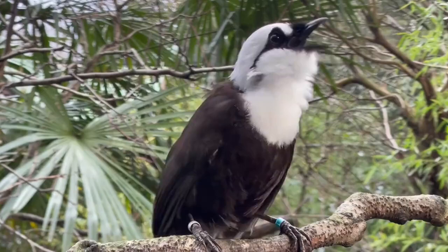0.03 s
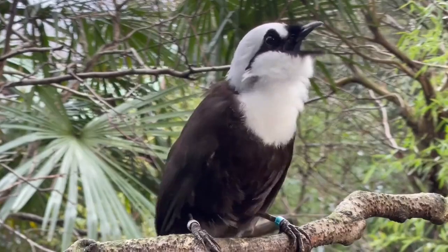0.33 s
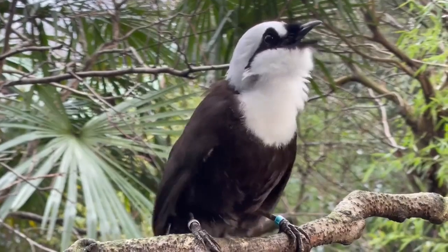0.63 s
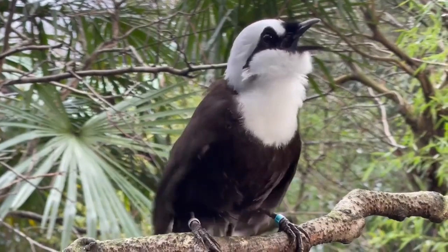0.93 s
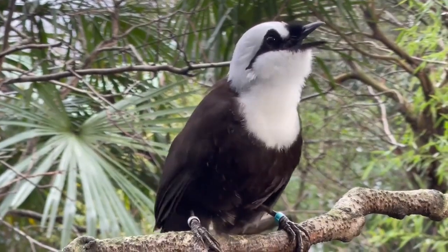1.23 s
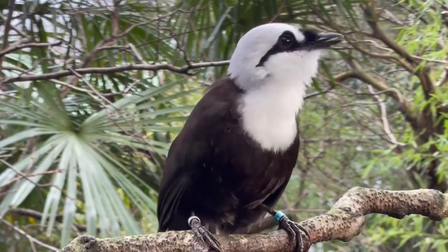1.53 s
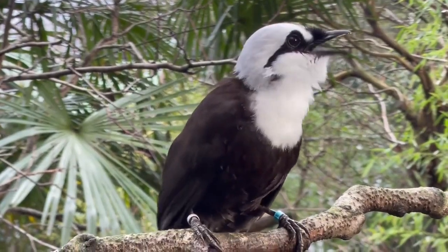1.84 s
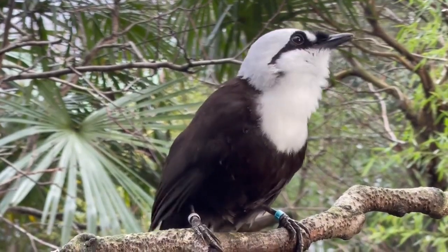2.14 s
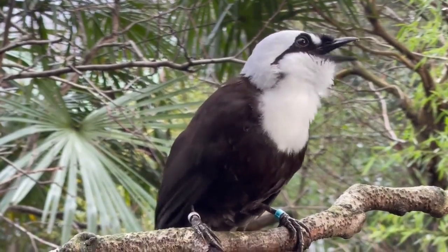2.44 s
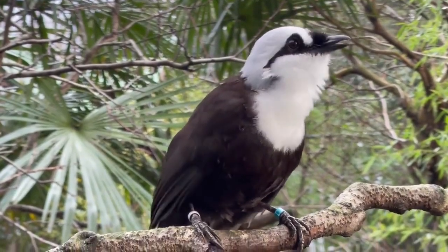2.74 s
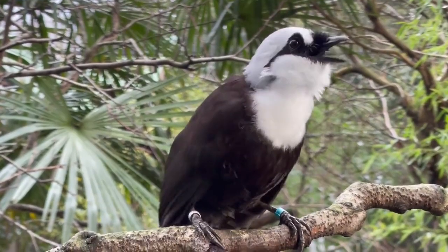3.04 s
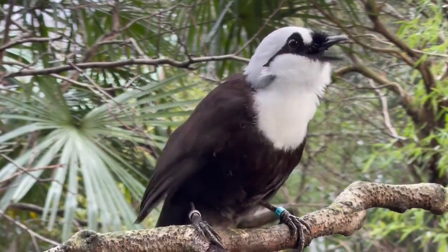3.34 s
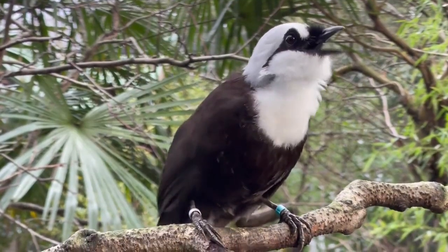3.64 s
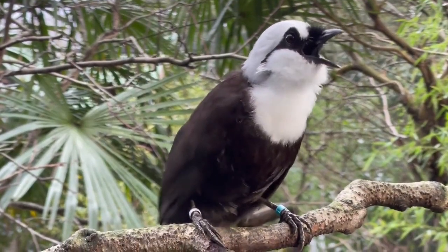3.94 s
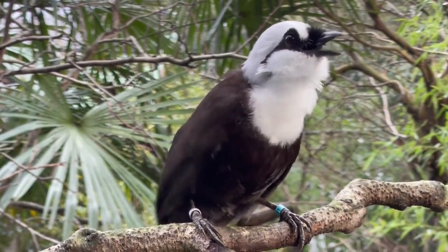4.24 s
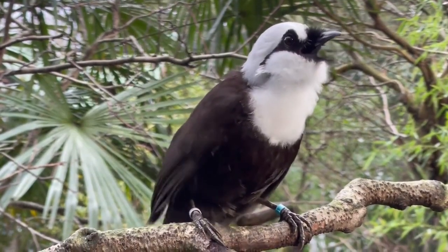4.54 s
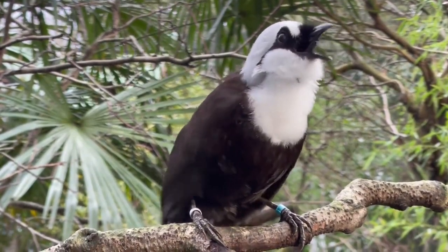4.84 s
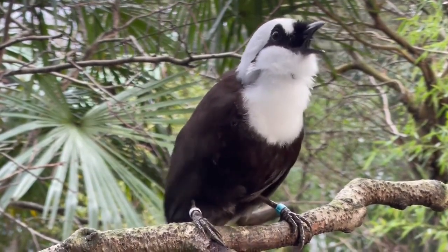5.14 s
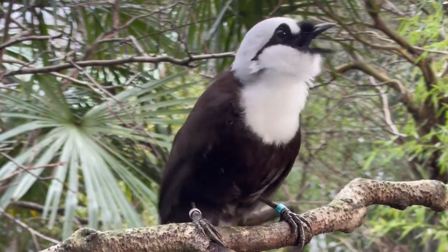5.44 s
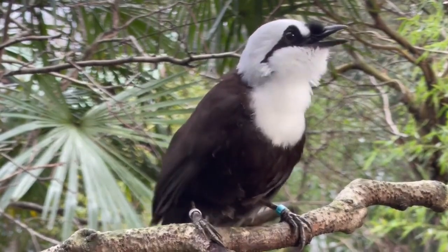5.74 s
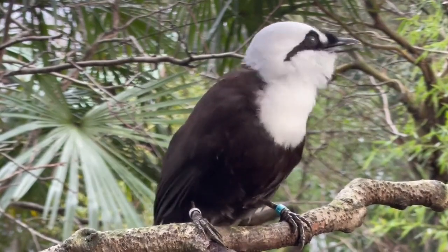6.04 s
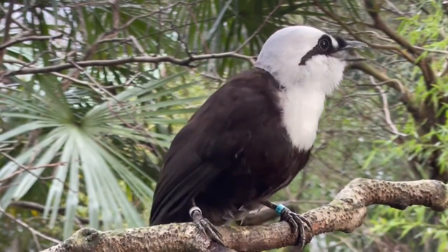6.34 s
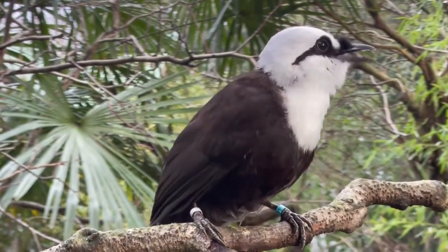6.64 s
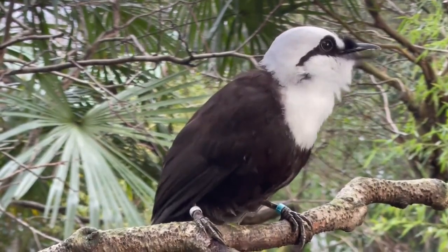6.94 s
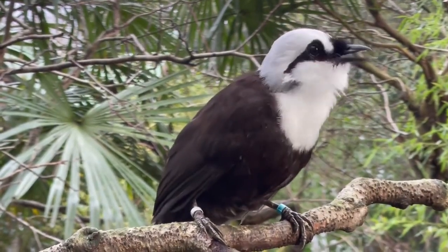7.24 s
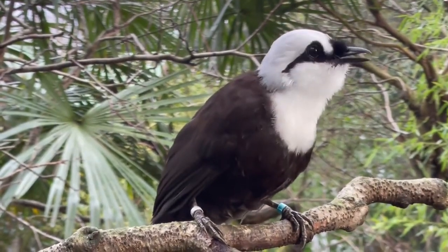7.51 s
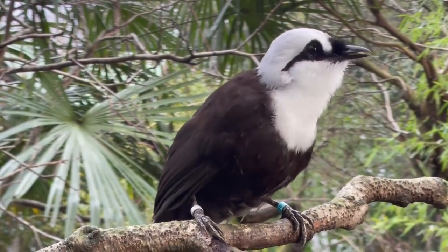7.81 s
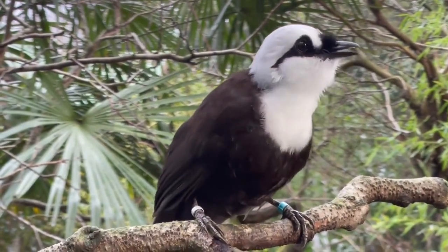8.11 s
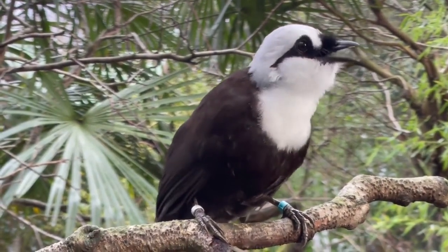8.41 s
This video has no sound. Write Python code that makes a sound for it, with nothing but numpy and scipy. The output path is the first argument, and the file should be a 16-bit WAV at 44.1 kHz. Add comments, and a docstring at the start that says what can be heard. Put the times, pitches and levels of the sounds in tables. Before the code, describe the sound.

Close, loud laughingthrush chatter alternates with quick upward whistles among foliage, with faint low traffic noise far away.

```python
"""Among foliage, a laughingthrush on a branch close by calls in rapid runs: sharp arched chips and
mellow rising whistles, many led in by a hoarse slur. Its throat cavity boosts one harmonic of the
syrinx, the second in chips and the first in whistles; the rest leave through windpipe and beak.
Leaves scatter the calls back, another bird whistles thinly far off, and distant traffic rumbles."""
import sys
import numpy as np
from scipy import signal
from scipy.fft import rfft, irfft, next_fast_len
from scipy.io import wavfile
from scipy.ndimage import uniform_filter1d, minimum_filter1d, map_coordinates

SR = 44100
rng = np.random.default_rng(int(sys.argv[2]) if len(sys.argv) > 2 else 0)


def generate_wav(signal):
    """Clip the signal to [-1, 1] and save it as 16-bit WAV at the path in sys.argv[1]."""
    frames = np.transpose(np.atleast_2d(signal))
    scaled = np.clip(frames, -1, 1) * 32767
    pcm = np.round(scaled).astype(np.int16)
    wavfile.write(sys.argv[1], SR, pcm)


N = 373527
BAND_LIMIT_HZ = 15700
# windpipe and beak, narrowed for slurs and whistles: f/Hz, gain/dB
NARROW_BEAK = [(2000, 16.5), (2700, 10.5), (3400, 6.5), (4300, -2.5), (5600, -1.5), (6800, 4), (8500, 2.5),
               (9800, 8.5), (11500, -0.5), (13000, -9.5), (15000, -22)]


def amp(db):
    """Decibels to amplitude."""
    return 10 ** (np.asarray(db) / 20)


def unit_rms(x):
    """Scales x to an rms of 1."""
    return x / np.sqrt(np.mean(x ** 2) + 1e-20)


def curve(points, hz, column=1):
    """One column of a spectrum table, joined on a log-frequency scale."""
    table = np.array(points, float)
    return np.interp(np.log(hz + 1), np.log(table[:, 0] + 1), table[:, column])


def bump(f, hz, half_width):
    """A resonance curve of height 1."""
    return 1 / (1 + ((f - hz) / half_width) ** 2)


def add(mix, start, sound):
    """Mixes a sound in at start seconds."""
    part = mix[round(start * SR):][:len(sound)]
    part += sound[:len(part)]


def colour(x, gain):
    """Filters x by gain(hz)."""
    size = next_fast_len(x.shape[-1] + 512)
    return irfft(rfft(x, size) * gain(np.fft.rfftfreq(size, 1 / SR)), size)[..., :x.shape[-1]]


def wander(size, hz):
    """Random drift of rms 1, rolling off above hz."""
    return unit_rms(colour(rng.standard_normal(size), lambda f: np.exp(-(f / hz) ** 2)))


def note_clock(start, end, fade_s=0.001955):
    """Onset time, progress u (0-1) through a note, and a gate that fades just outside its ends."""
    t = np.arange(start - fade_s, end + fade_s, 1 / SR)
    gate = np.sin(np.pi / 2 * np.clip(np.minimum(t - t[0], t[-1] - t) / fade_s, 0, 1)) ** 2
    return t[0], np.clip((t - start) / (end - start), 0, 1), gate


def glide(steps, u):
    """Smooth pitch line through evenly spaced steps."""
    return map_coordinates(np.array(steps, float), [u * (len(steps) - 1)], order=3, mode="nearest")


def traffic():
    """A stereo bed of outdoor air and far traffic rumble, with two drones that come and go."""
    # colour of the bed: f/Hz, relative level/dB
    spectrum = [(20, -6.5), (35, -21), (52, 5), (78, -8), (100, -7.5), (150, -9.5), (250, -14.5),
                (420, -22.5), (800, -20), (1500, -20.5), (2600, -30), (5000, -43.5), (10000, -49),
                (14000, -60.5)]
    # likeness of left and right: f/Hz, correlation
    likeness = [(60, 1), (125, 0.95), (250, 0.86), (600, 0.3), (2000, 0.27), (8000, 0.22)]
    # noise band of each drone: f/Hz, half-width/Hz
    drone_bands = [(60, 12.5), (104, 10.7)]
    # swells of the drones: t/s, lower drone level/dB, upper drone level/dB
    drone_swells = [(.15, -48.5, -57), (1.1, -46.5, -54.5), (1.5, -54, -47.5), (2.9, -47.5, -46),
                    (3.5, -55.5, -58.5), (4.15, -47, -49.5), (4.9, -56.5, -51.5), (6.2, -45.5, -49.5),
                    (8.4, -44.5, -53.5)]
    shared, apart = rng.standard_normal((2, N))
    mid = colour(shared, lambda f: amp(curve(spectrum, f)) * np.sqrt(1 + curve(likeness, f)))
    side = colour(apart, lambda f: amp(curve(spectrum, f)) * np.sqrt(1 - curve(likeness, f)))
    bed_db = -45.5 + 1.1 * wander(N, hz=3)
    out = amp(bed_db) * unit_rms(np.array([mid + side, mid - side]))
    times, *levels = np.transpose(drone_swells)
    for (hz, half_width), db in zip(drone_bands, levels):
        drone = colour(rng.standard_normal(N), lambda f: 1 / (1 + ((f - hz) / half_width) ** 4))
        out += unit_rms(drone) * amp(np.interp(np.arange(N) / SR, times, db))
    return out * amp([[.4], [-.4]])  # leans slightly left


def motor_hum():
    """One wavering line of a distant motor that comes and goes, sinking in pitch."""
    # course of the hum: t/s, f/Hz, level/dB
    course = [(.1, 225, -74), (2.2, 235, -61), (3.9, 212, -62), (4.6, 208, -53), (5.3, 210, -62),
              (6.1, 192, -49.5), (6.8, 180, -68), (8.45, 180, -72)]
    times, *columns = np.transpose(course)
    hz, db = (np.interp(np.arange(N) / SR, times, c) for c in columns)
    phase = 2 * np.pi * np.cumsum(hz * (1 + .032 * wander(N, hz=21.4))) / SR
    return amp(db) * unit_rms((1 + .48 * wander(N, hz=26)) * np.sin(phase))


def beak_at(time, shape):
    """Gain curve of windpipe and beak: the gape moves a treble resonance and lets out more or less sheen."""
    # effect of the gape: t/s, resonance f/Hz, boost/dB, sheen/dB
    gape = [(.1, 5230, 8.5, -11), (.9, 5400, 14, 1.5), (1.5, 5720, 18.5, 8), (2.7, 6640, -17.5, -9.5),
            (2.85, 7040, 12, 0), (3.19, 8600, 10, -8), (3.6, 8670, 12, -28), (3.67, 5740, 9.5, 2),
            (5.5, 5700, 7, -8), (5.7, 5350, 20, 15), (6.5, 6730, 8.5, -4), (8.4, 6930, 15.5, 4)]
    times, *columns = np.transpose(gape)
    hz, boost_db, sheen_db = (np.interp(time, times, c) for c in columns)
    grid_hz = np.linspace(0, SR / 2, num=32)
    tint_db = 1.8 * rng.standard_normal(len(grid_hz))  # each note takes its own colour
    return lambda f: amp(curve(shape, f) + boost_db * bump(f, hz, half_width=480)
                         + sheen_db * bump(f, hz=12800, half_width=1530)
                         + np.interp(f, grid_hz, tint_db))


def syrinx(hz, beak, jitter, flutter, breathy, square_db, boosted):
    """The harmonic that the throat boosts, and the breathy overtones above it with a treble of rms 1."""
    size = len(hz)
    phase = 2 * np.pi * np.cumsum(hz * (1 + jitter * wander(size, hz=1080))) / SR
    overtones = np.zeros(size)
    for k in range(boosted + 1, 19):
        # a hard-driven tone squares off, which favours its odd multiples
        odd_multiple = k % (2 * boosted) == boosted
        gain = beak(k * hz) * amp(square_db * odd_multiple) * (k * hz < BAND_LIMIT_HZ)
        flicker = 1 + flutter * wander(size, hz=130)
        overtones += gain * flicker * np.cos(k * phase + 2 * np.pi * rng.random())
    # air escapes in a puff each cycle and takes the same way out
    puffs = colour(rng.standard_normal(size) * (1 + np.cos(phase)), lambda f: beak(f) * (f > 700))
    overtones = unit_rms(overtones) + breathy * unit_rms(puffs)
    treble = colour(overtones, lambda f: f > 5000)
    return np.sqrt(2) * np.cos(boosted * phase), overtones / treble.std()


def chip(start, length, tune, top_hz, db, treble_db):
    """Onset and voice of a hard-driven note that swells as it sweeps through a throat resonance."""
    # envelope: share of the note, tone/dB, overtones/dB
    envelope = [(0, -15.5, -17), (0.151, -2, -3), (.25, -3, -0.5), (.45, 1, 1.5), (.6, -2.5, 2.5),
                (.76, -3.5, -0.5), (.85, 0.5, -5), (0.909, -4.5, -2), (1, -16.5, -16.5)]
    # windpipe and beak, wide open: f/Hz, gain/dB
    open_beak = [(1100, -3), (2300, 5), (3200, -2.5), (4000, -5.5), (4750, -21.5), (5500, -3.5), (6700, -8),
                 (7500, -3.5), (8400, -4.5), (9700, 0), (10900, 1), (11700, -2), (12600, -43.5)]
    # throat resonance: f/Hz, half-width/Hz, boost/dB
    throat = (1666, 120, 7.56)
    shares, tone_db, edge_db = np.transpose(envelope)
    throat_hz, half_width, boost_db = throat
    onset, u, gate = note_clock(start, start + length)
    hz = top_hz * glide(tune, u)
    tone, overtones = syrinx(hz / 2, beak_at(start, open_beak),
                             jitter=.008, flutter=.65, breathy=.16, square_db=11, boosted=2)
    throat_db = boost_db * bump(hz, throat_hz, half_width)
    tone *= amp(db + np.interp(u, shares, tone_db) + throat_db + .6 * wander(len(u), hz=200))
    overtones *= amp(treble_db + np.interp(u, shares, edge_db))
    # the faint fundamental, an octave under the tone, grows with pitch
    fundamental_db = db - 23 + 16.5 * np.log2(hz / 2 / 1050)
    fundamental = np.sqrt(2) * np.cos(np.pi * np.cumsum(hz) / SR) * amp(fundamental_db)
    return onset, gate * (tone + fundamental + overtones)


def rasp(start, length, db):
    """Onset and sound of a chip's hoarse air, strongest as the pitch collapses and outlasting the tone."""
    # envelope: share of the note, level against the chip/dB
    envelope = [(0, -19), (.3, -30), (.7, -25.5), (.9, -16), (1, -15.5)]
    # colour of the air: f/Hz, gain/dB
    spectrum = [(500, -12), (900, -12.5), (1300, 7), (2200, -1), (2700, -1), (3400, -15.5), (4500, -12.5),
                (7000, -52)]
    onset, u, gate = note_clock(start, start + length + .0042, fade_s=.005)
    air = unit_rms(colour(rng.standard_normal(len(u)), lambda f: amp(curve(spectrum, f))))
    return onset, gate * air * amp(db + np.interp(u, *np.transpose(envelope)))


def chatter():
    """Bursts of chips: an arch, often repeated at once, then a closing hook."""
    # arched chips: t/s, count, top f/Hz, treble/dB
    arches = [(.123, 1, 2308, -30), (.332, 2, 2192, -29), (.597, 2, 2180, -29.5), (.843, 1, 2165, -28),
              (3.402, 2, 2111, -32.5), (3.674, 2, 2197, -28.5), (3.945, 2, 2224, -27.5),
              (4.211, 2, 2156, -28.5), (4.490, 2, 2177, -29), (4.762, 2, 2197, -28.5),
              (5.040, 2, 2208, -29), (5.328, 2, 2170, -29.5)]
    # hooked chips: t/s, top f/Hz, level/dB, treble/dB
    hooks = [(.204, 2300, -19.5, -29), (0.4721, 2300, -18.5, -28.5), (.738, 2215, -19.5, -31),
             (.927, 2137, -19, -29), (3.104, 2253, -26, -42.5), (3.1847, 2180, -19, -32.5),
             (3.269, 2110, -17.5, -33.5), (3.550, 2245, -18.5, -29.5), (3.8163, 2336, -18, -30.5),
             (4.088, 2223, -18.5, -29), (4.357, 2257, -18.5, -28.5), (4.6358, 2320, -18, -29),
             (4.911, 2324, -18.5, -29), (5.187, 2314, -19, -30), (5.4707, 2291, -19.5, -30.5)]
    # pitch contours at even steps through the note: share of the top pitch
    arch_tune = [.62, .69, .77, .84, .87, .93, 0.98, 0.98, .86, .68, 0.575]
    repeat_tune = [.63, .67, .735, .805, .84, .89, .98, 1.025, .95, .73, 0.585]
    hook_tune = [.93, .91, .89, .88, .89, .94, 1, 1, .94, .73, .58]
    arch_s, repeat_s, hook_s = .057, .049, .044
    arch_db, repeat_after_s = -19, .063
    notes = [(start, hook_s, hook_tune, *rest) for start, *rest in hooks]
    for start, count, top_hz, treble_db in arches:
        notes.append((start, arch_s, arch_tune, top_hz, arch_db, treble_db))
        if count > 1:  # the repeat is shorter and duller
            notes.append((start + repeat_after_s, repeat_s, repeat_tune, top_hz, arch_db, treble_db - 2))
    out = np.zeros(N)
    for start, length, tune, top_hz, db, treble_db in notes:
        add(out, *chip(start, length, tune, top_hz, db, treble_db))
        add(out, *rasp(start, length, db))
    return out


def foliage(calls, predelay_s=.003, early_t60=.06, build_s=.015):
    """Quick scatter from near leaves and branches, then a faint tail, different on each side."""
    # scatter of the leaves: f/Hz, early gain/dB, tail gain/dB, tail t60/s
    scatter = [(500, -23, -27, .4), (1200, -24, -28, .42), (1700, -24, -27.5, .4), (2300, -20, -21.5, .42),
               (4400, -14, -20, .33), (6000, -8, -16, .35), (12000, -8, -19, .28)]
    hz, t, noise = signal.stft(rng.standard_normal((2, 2, SR // 2)), SR, nperseg=256)
    tail_t60 = curve(scatter, hz, column=3)[:, None]
    tail = signal.istft(noise[0] * amp(-60 * t / tail_t60), SR, nperseg=256)[1]
    early = signal.istft(noise[1] * amp(-60 * t / early_t60), SR, nperseg=256)[1]
    age = np.arange(tail.shape[1]) / SR
    early *= age > predelay_s
    tail *= np.minimum(age / build_s, 1)
    echo = colour(early / np.linalg.norm(early[0]), lambda f: amp(curve(scatter, f, column=1)))
    echo += colour(tail / np.linalg.norm(tail[0]), lambda f: amp(curve(scatter, f, column=2)))
    echo = echo + .46 * echo[::-1]  # left and right share part of the scatter
    return signal.fftconvolve(calls[None], echo, axes=1)[:, :N]


def slurs(length_s=.028, swell_db=16):
    """The syrinx starts low and unsteady on its second harmonic; the fundamental grows as it climbs."""
    # hoarse lead-ins to the whistle pairs: t/s, level/dB, middle f/Hz
    notes = [(1.063, -23, 797), (1.354, -27.5, 751), (1.645, -28, 676), (5.612, -24, 728),
             (5.903, -25.5, 692), (6.205, -30, 668), (6.51, -28.5, 702), (6.877, -35, 642),
             (7.286, -31.5, 614), (7.899, -34.5, 583), (8.271, -37, 598)]
    out = np.zeros(N)
    for start, db, middle_hz in notes:
        onset, u, gate = note_clock(start, start + length_s)
        hz = middle_hz * np.exp(.55 * (u - .5))
        _, overtones = syrinx(hz, beak_at(start, NARROW_BEAK),
                              jitter=.005, flutter=1, breathy=.8, square_db=-7, boosted=2)
        shake = .07 * (1 - u) * wander(len(u), hz=600)
        phase = 2 * np.pi * np.cumsum(hz * (1 + shake)) / SR
        fundamental = amp(-22 + 21.3 * u ** 3) * np.cos(phase)
        tone = fundamental + np.cos(2 * phase) + amp(-48 * u) * np.cos(3 * phase)
        swell = unit_rms(gate * amp(-swell_db * abs(2 * u - 1)))
        treble_db = -54.5 + 2.16 * (db + 28)  # louder slurs are brighter
        add(out, onset, swell * (amp(db) * unit_rms(tone) + amp(treble_db) * overtones))
    return out


def whistles(attack_s=.012, release_s=.011, full_hz=1498, db_per_octave=22):
    """Nearly pure notes, in pairs or trills, that swell as they climb; overtones flare on the way up."""
    # whistles: t/s, length/s, tune, foot f/Hz, top f/Hz, level/dB, catch depth/dB, treble/dB
    notes = [(1.0866, 0.057, "step", 1210, 1648, -11.5, 3.5, -37),
             (1.1824, .066, "swoop", 994, 1678, -14.5, -0.5, -40),
             (1.3763, 0.061, "step", 1150, 1532, -12.5, -1.5, -42),
             (1.4776, 0.063, "swoop", 1030, 1690, -12, 1, -40.5),
             (1.6708, 0.057, "step", 1232, 1644, -13.5, 0.5, -44),
             (1.7689, 0.064, "swoop", 1094, 1680, -13.5, 1, -45),
             (1.905, 0.062, "swoop", 974, 1703, -15, 1, -37.5),
             (2.0147, 0.05, "trill", 1104, 1686, -13, 6, -41),
             (2.1116, 0.05, "trill", 1112, 1646, -14, 0, -44),
             (2.2093, .049, "trill", 1193, 1673, -13.5, -1, -47),
             (2.3126, 0.048, "trill", 1190, 1670, -14.5, -1, -45),
             (2.4113, .049, "trill", 1248, 1694, -15, -1.5, -44),
             (2.5138, .044, "trill", 1312, 1720, -14.5, -2, -42),
             (2.6153, 0.041, "trill", 1359, 1745, -14, 4, -39),
             (2.704, 0.043, "trill", 1333, 1716, -15, 4.5, -38.5),
             (2.806, 0.048, "swoop", 1232, 1646, -11.5, 8.5, -39.5),
             (2.908, 0.047, "swoop", 1239, 1584, -10, 12.5, -38),
             (3.01, 0.046, "swoop", 1185, 1529, -11, 14, -38),
             (3.098, .047, "swoop", 1184, 1500, -18.5, 13, -38.5),
             (5.6351, .058, "step", 1150, 1598, -13, 4.5, -41.5),
             (5.730, 0.066, "swoop", 1093, 1700, -12, -1.5, -39.5),
             (5.9314, 0.055, "step", 1188, 1576, -11, 1, -41),
             (6.031, 0.063, "swoop", 1050, 1722, -14.5, -2, -42),
             (6.2295, .061, "step", 1201, 1584, -14.5, 0.5, -46),
             (6.3365, .066, "swoop", 1113, 1687, -12, 2.5, -45.5),
             (6.5357, 0.062, "step", 1187, 1602, -13.5, 6, -47),
             (6.6418, 0.064, "swoop", 1010, 1704, -16, 1.5, -43),
             (6.904, 0.059, "step", 1123, 1512, -14.5, -1, -47.5),
             (7.0143, .065, "swoop", 1070, 1668, -13, -1.5, -45),
             (7.3136, 0.061, "step", 1090, 1483, -12, 0.5, -46),
             (7.4154, .067, "swoop", 981, 1690, -13.5, 8, -41),
             (7.926, 0.056, "step", 1082, 1457, -14.5, -1, -47.5),
             (8.028, 0.066, "swoop", 1032, 1663, -12.5, -1, -43.5),
             (8.2956, 0.066, "step", 1102, 1530, -14.5, 1, -42.5),
             (8.4078, 0.061, "swoop", 1033, 1680, -13, 0.5, -42)]
    # step, swoop and trill at even steps through the note: height (0 = foot, 1 = top)
    climbs = {"step": [-0.58, -.3, -.08, .08, .18, .23, .42, .76, 0.95, 0.954, 0.68], "swoop": [-.16, -.08,
              -.02, .05, .17, 0.33, .72, 0.897, 1, 0.94, 0.9], "trill": [-.15, -0.137, -.05, 0.074, .24,
              .54, .83, 0.99, 1, .95, 0.8]}
    # flare of the overtones: share of the note, gain/dB
    flare = [(0, -19.5), (.2, -8), (.4, -2), (.6, 3.5), (.7, -2), (.85, -4), (1, -9)]
    # second harmonic: f/Hz, level against the tone/dB
    octave_levels = [(1700, -19), (2100, -42), (2300, -47), (2600, -30), (3000, -32.5), (3400, -37.5)]
    sag_hz_per_db, shake_hz_per_db = 14.5, 3.5
    out = np.zeros(N)
    for start, length, tune, foot_hz, top_hz, db, depth_db, treble_db in notes:
        onset, u, gate = note_clock(start, start + length)
        # the catch: level and pitch dip just before the climb (a negative depth lifts them)
        catch_db = depth_db * np.exp(-((u - .45) / .1256) ** 2)
        hz = foot_hz + (top_hz - foot_hz) * glide(climbs[tune], u)
        hz += catch_db * (shake_hz_per_db * wander(len(u), hz=400) - sag_hz_per_db)
        tone, overtones = syrinx(hz, beak_at(start, NARROW_BEAK),
                                 jitter=.005, flutter=.55, breathy=.4, square_db=0, boosted=1)
        octave = unit_rms(tone ** 2 - 1) * amp(curve(octave_levels, 2 * hz))
        t = np.arange(len(u)) / SR
        push = np.sin(np.pi / 2 * np.minimum(1, np.minimum(t / attack_s, t[::-1] / release_s))) ** 2
        tone_db = db + db_per_octave * np.log2(np.minimum(hz / full_hz, 1)) - catch_db
        tone_db += 1.73 * wander(len(u), hz=90) - 2 * (u - .5)  # wavers as the push eases
        overtones *= amp(treble_db + np.interp(u, *np.transpose(flare)))
        add(out, onset, push * (tone + octave) * amp(tone_db) + gate * overtones)
    return out


def far_bird():
    """Thin, wavering falling whistles from a second bird."""
    # far calls: start t/s, end t/s, from f/Hz, to f/Hz, level/dB
    calls = [(2.85, 3.02, 8250, 7750, -53), (3.03, 3.12, 7750, 7450, -63), (3.6, 3.68, 4100, 3880, -57)]
    out = np.zeros(N)
    for start, end, from_hz, to_hz, db in calls:
        onset, u, gate = note_clock(start, end, fade_s=.0082)
        hz = (from_hz + (to_hz - from_hz) * u) * (1 + .005 * wander(len(u), hz=200))
        flicker = amp(4 * wander(len(u), hz=40))
        tone = np.sin(2 * np.pi * np.cumsum(hz) / SR)
        add(out, onset, gate * amp(db) * unit_rms(flicker * tone))
    return out


def pan(calls):
    """The direct sound reaches left and right slightly unevenly in level and phase."""
    # left against right: f/Hz, level/dB, phase lead/rad
    balance = [(700, .3, 0), (1300, .3, .09), (1650, .5, .11), (1900, 2.3, .15), (2300, 4, .18),
               (4400, 0, .45), (12000, 0, .52)]

    def side_gain(f, sign):
        return amp(sign * curve(balance, f) / 2) * np.exp(.5j * sign * curve(balance, f, column=2))
    return np.array([colour(calls, lambda f: side_gain(f, sign)) for sign in (1, -1)])


def scene():
    """Both birds, direct and scattered by the leaves, over the traffic bed."""
    birds = chatter() + whistles() + slurs() + far_bird()
    return pan(birds) + foliage(birds) + traffic() + motor_hum()


def limiter(x, ceiling=.34):
    """Turns the gain down for a few milliseconds wherever the peaks pass the ceiling."""
    gain = np.minimum(1, ceiling / (abs(x).max(0) + 1e-9))
    return x * uniform_filter1d(minimum_filter1d(gain, size=161), size=161)


def record(dry):
    """Fades in after a tenth of a second of near silence; then a limiter and a low-pass."""
    fade_in = amp(np.interp(np.arange(N) / SR, [0, .095, .12], [-36, -24, 0]))
    low_pass = signal.firwin(511, BAND_LIMIT_HZ, window=("kaiser", 9), fs=SR)
    return signal.oaconvolve(limiter(dry * fade_in), low_pass[None], "same")


dry = scene()
out = record(dry)
generate_wav(out)
```